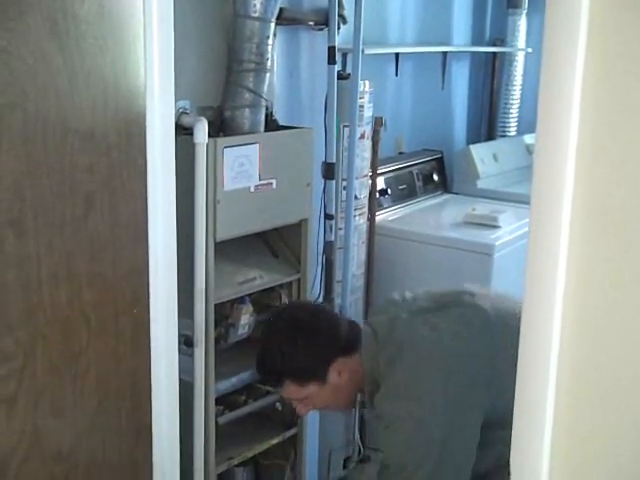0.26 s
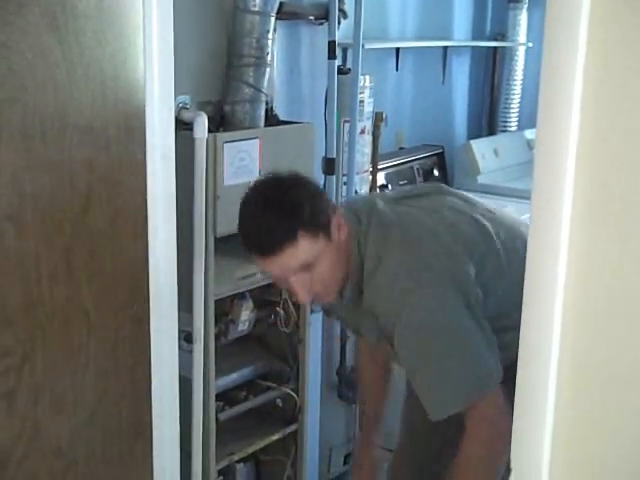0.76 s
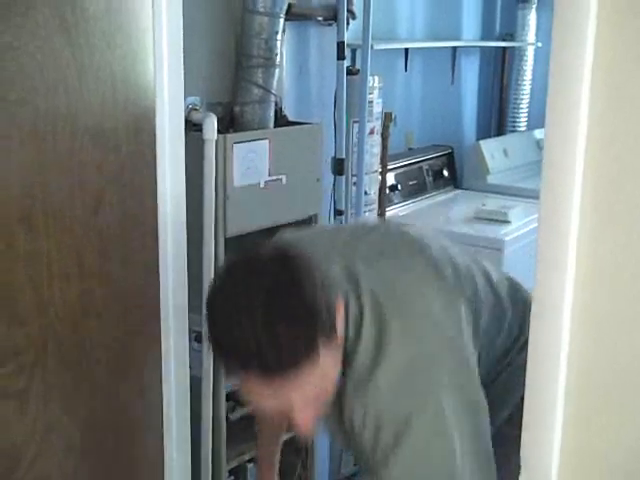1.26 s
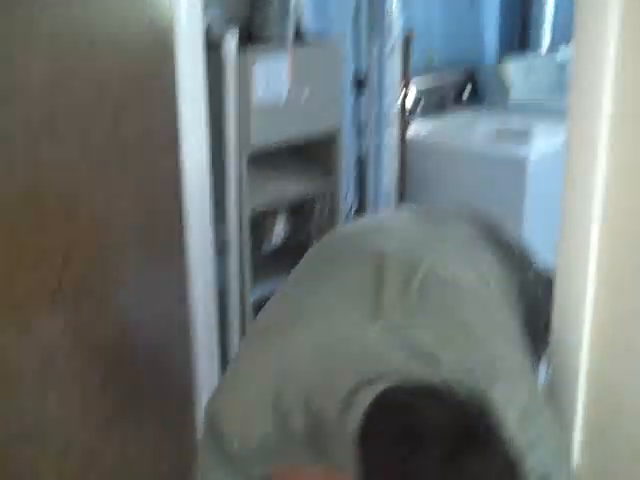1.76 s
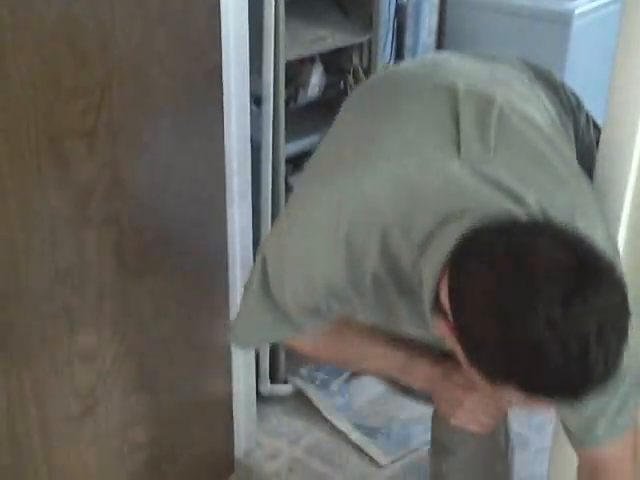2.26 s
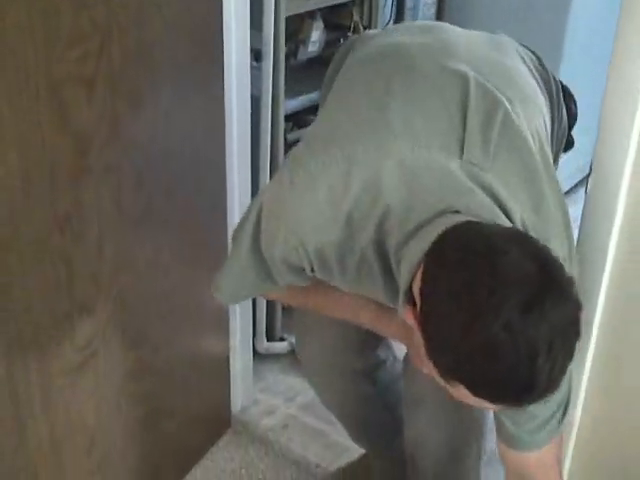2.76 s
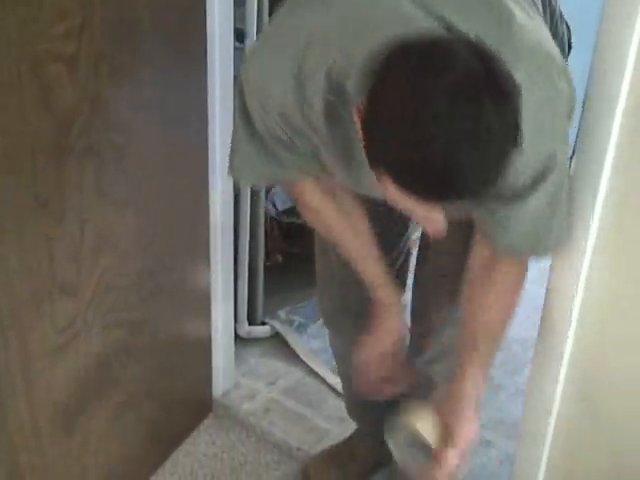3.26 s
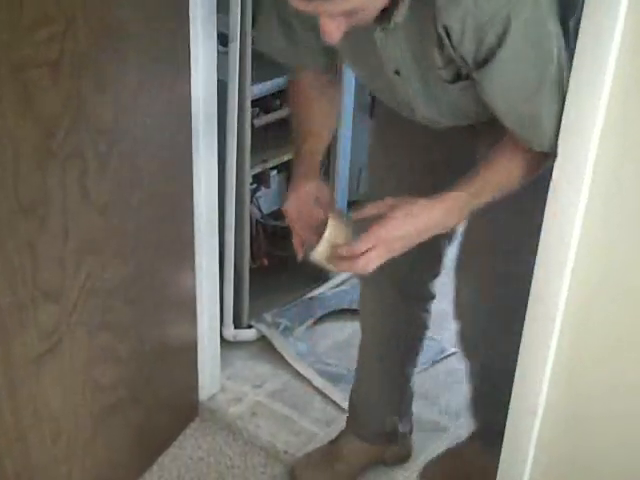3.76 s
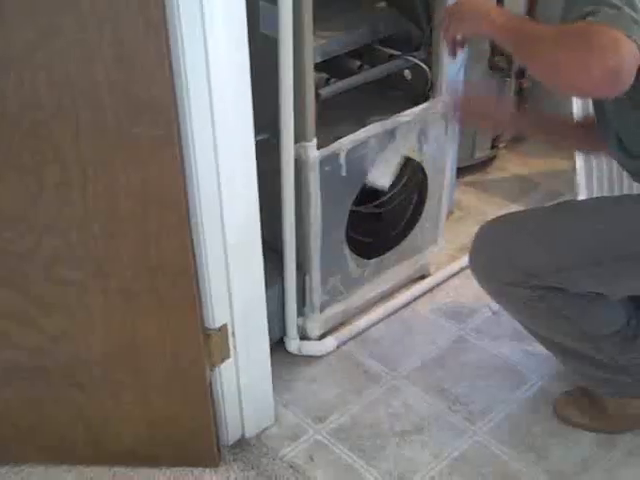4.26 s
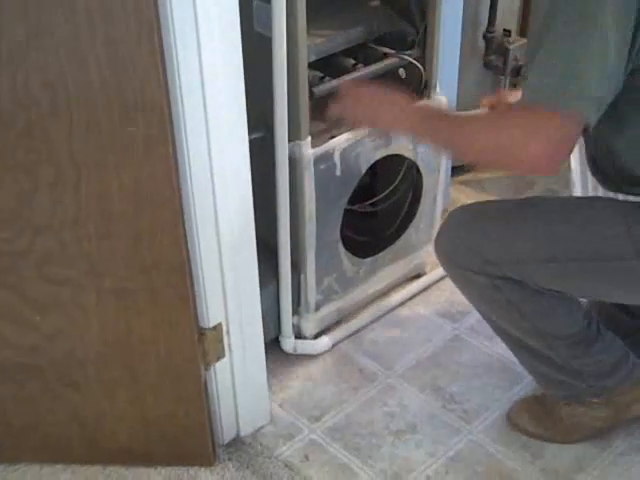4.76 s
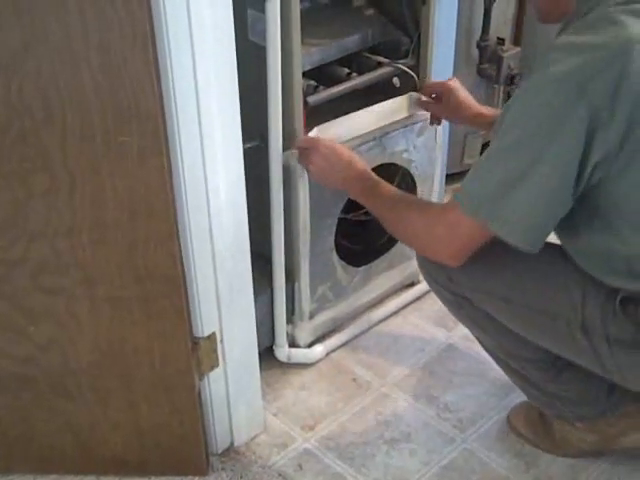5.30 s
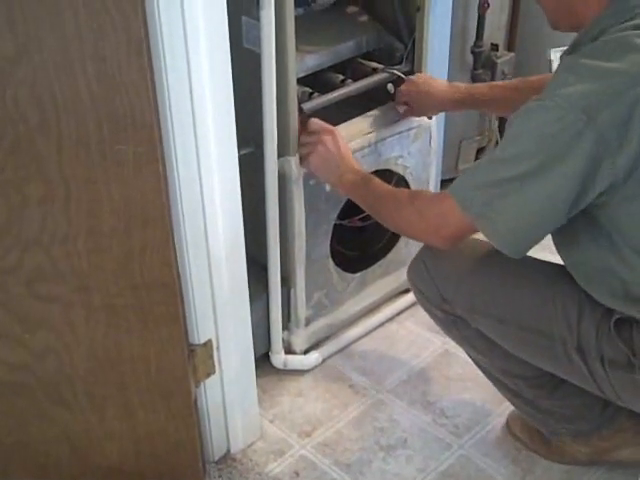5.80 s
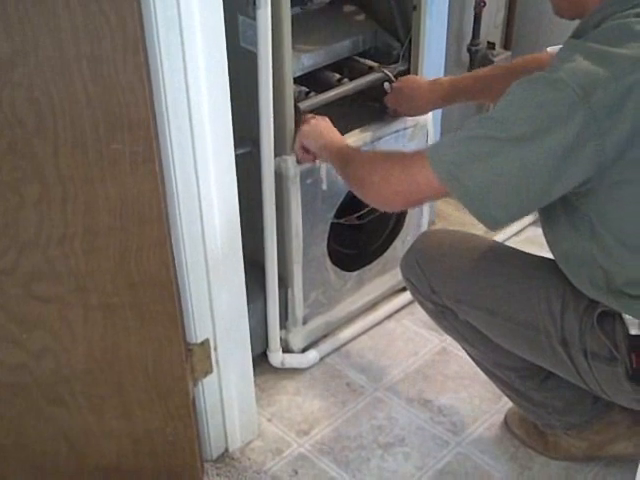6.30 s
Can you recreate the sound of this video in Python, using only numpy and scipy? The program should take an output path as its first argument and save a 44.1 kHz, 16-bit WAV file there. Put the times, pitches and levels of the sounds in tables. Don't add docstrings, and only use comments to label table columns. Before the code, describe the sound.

A small, hard, reverberant closet under steady recorder hiss. Light knocks on hollow sheet metal at 0 and 0.27 s, with faint rustle; at 0.7-0.78 s a loud clattering cluster of panel bangs, ringing briefly, then a smaller knock at 0.93. From 1.57 s plastic sheeting crumples in crackling bursts with sharp snaps and faint high metal tinks, peaking at 2.15-2.2 in a hard bump that overloads the microphone; the hiss dips with a low thump and steps back up from about 2.5 to 2.8. A metallic knock lands at 2.44. Softer crinkling swells near 3.0 and 3.2, with a dull knock at 3.9 and a snap at 4.24. Silence falls at 4.33-4.43, then hiss returns with a thump. A knock at 4.66, then a bright tape pull near 4.75, small peels and ticks at 4.9-5.5, snaps around 5.7-5.85, and strong crackling snaps from 6.06 to 6.4, fading.

```python
import sys
import numpy as np
from scipy import signal
from scipy.fft import rfft, irfft
from scipy.io import wavfile

SR = 44100
rng = np.random.default_rng(int(sys.argv[2]) if len(sys.argv) > 2 else 0)


def unload_audio(sound):
    columns = np.transpose(np.atleast_2d(sound))
    steps = np.round(np.clip(columns, -1, 1) * 32767)
    wavfile.write(sys.argv[1], SR, steps.astype(np.int16))


def boost_factor(decibels):
    exponent = np.asarray(decibels, float) / 20
    return 10 ** exponent


N = 288414
SILENCE_START_S, SILENCE_END_S = 4.327, 4.4256


def rms_one(x):
    return x / np.sqrt(np.mean(x ** 2) + 1e-20)


def at_hz(points, hz):
    points = np.array(points)
    return np.interp(np.log(hz), np.log(points[:, 0]), points[:, 1])


def coloured(x, spectrum):
    hz = np.fft.rfftfreq(N, 1 / SR) + 1
    return rms_one(irfft(rfft(x) * boost_factor(at_hz(spectrum, hz)), N))


def band_pass(x, low, high):
    return signal.sosfilt(signal.butter(2, [low, high], "band", fs=SR, output="sos"), x)


def high_pass(x, hz):
    return signal.sosfilt(signal.butter(2, hz, "high", fs=SR, output="sos"), x)


def drift(rate_hz):
    r = np.exp(-2 * np.pi * rate_hz / SR)
    wander = signal.lfilter([1], [1, -2 * r, r * r], rng.standard_normal(N + SR))
    return rms_one(wander[SR:])


def grains(per_s, spread_db):
    sizes = boost_factor(spread_db * np.minimum(rng.exponential(1, N), 5)) * rng.choice([-1, 1], N)
    return rms_one(sizes * (rng.random(N) < per_s / SR))


def film_bands(x):
    # f/Hz, level/dB per Hz
    film = [(71, -46), (120, -33), (221, -13.5), (416, -12), (691, -5.5), (1170, -4.5), (1590, 6.5),
            (1870, -7), (2870, 2), (12200, -9), (15600, -11)]
    anchors = np.log([700, 3000, 10000])
    edges = 130 * 2 ** np.arange(0, 7.1, .5)
    for k, (low, high) in enumerate(zip(edges, edges[1:])):
        hz = np.sqrt(low * high)
        band = band_pass(x[k % 2], low, high)
        near = [np.interp(np.log(hz), anchors, one) for one in np.eye(3)]
        anchor_db = sum(share * at_hz(film, np.exp(a)) for share, a in zip(near, anchors))
        yield band * boost_factor(at_hz(film, hz) - anchor_db) * (-1) ** k, near[0], near[2]


def thuds():
    # t/s, f/Hz, level/dB, t60/s
    hollows = [(.004, 685, -51.5, 0.077), (.022, 470, -54.5, 0.36), (.024, 790, -57, 0.12),
               (.28, 422, -61.5, 0.27), (.706, 330, -38.5, 0.056), (0.801, 152, -57, .5),
               (1.2, 600, -63.5, 0.79), (2.151, 1050, -41, .03), (2.44, 1550, -45.5, 0.69),
               (2.446, 4640, -44.5, 0.37), (.735, 2120, -36.5, 0.29), (2.801, 1310, -58, .5),
               (3.215, 272, -58, .1), (3.91, 255, -57.5, 0.19), (4.6, 486, -59, 0.13)]
    half_width = 0.17
    out, age = np.zeros(N), np.arange(SR // 2) / SR
    for s, hz, level_db, t60 in hollows:
        noise = rng.standard_normal(len(age))
        cluster = rms_one(band_pass(noise, hz * (1 - half_width), hz * (1 + half_width)))
        out[round(s * SR):][:len(age)] += boost_factor(level_db - 60 * age / t60) * cluster
    return out


def panel():
    # t/s, peak level/dB, centre f/Hz
    knocks = [(0.023, -46, 617), (0.045, -45, 453), (0.266, -39.5, 875), (.705, -21, 1470),
              (.728, -16, 1320), (.740, -19, 1920), (0.75, -19, 1190), (.761, -17.5, 1200),
              (0.773, -21.5, 1800), (.927, -30, 1840), (1.194, -43, 570), (2.421, -35.5, 1220),
              (2.436, -29, 1450), (2.452, -27.5, 1600), (3.214, -38, 920), (3.908, -31.5, 370.4),
              (4.24, -39, 570), (4.543, -45, 904), (4.662, -32, 1870)]
    # f/Hz, level/dB per Hz
    sheet_metal = [(88, -64), (150, -38.5), (397, -17), (428, -10.5), (524, -6), (630, -6.5), (885, -6.5),
                   (1020, -3), (1590, -4.5), (1720, -8.5), (1860, -7), (4270, -22.5), (6000, -34),
                   (7800, -59.5), (13200, -120)]
    shimmer = coloured(rng.standard_normal(N), sheet_metal)
    out, age = np.zeros(N), np.arange(SR // 4) / SR
    decay = boost_factor(-60 * age / 0.19) + 1.99 * boost_factor(-60 * age / 0.028)
    for s, peak_db, hz in knocks:
        i = round(s * SR)
        body = shimmer[i:i + len(age)] * decay
        spot = band_pass(body, hz / 1.51, hz * 1.48)
        out[i:i + len(age)] += boost_factor(peak_db - 21) * (0.8 * body + 0.84 * spot)
    return high_pass(out, 260)


def handling():
    # peak t/s, level/dB, rise/s and fall/s over 20 dB, brightness/dB
    sheet_moves = [(.17, -67.5, 0.89, 1, -9), (.70, -60, 0.33, .03, -2), (1.622, -49.5, 0.042, 0.23, 1.5),
                   (1.883, -54, 0.081, 0.48, 1.5), (2.075, -50.5, 0.033, 0.34, 5),
                   (2.143, -44.5, 0.14, 0.035, -3), (2.23, -56.5, 0.061, 0.057, 1),
                   (2.40, -59, 0.28, 0.14, -4), (.58, -64.5, .1, .3, -7), (2.671, -55, 0.12, 0.11, 2),
                   (2.791, -54.5, .1, 0.5, 0), (2.9, -60, 0.23, 0.18, 2), (3.12, -62, .2, .2, -0.5),
                   (1.79, -67, 0.15, .2, 1), (3.001, -46, 0.12, 0.14, 1), (3.205, -53, 0.22, 0.069, 5.5),
                   (3.335, -63.5, 0.092, 0.17, 1), (3.704, -62, .11, 0.23, -4.5),
                   (3.806, -71, 0.14, 0.066, 2), (4.096, -64.5, 0.2, 0.55, 0)]
    # peak t/s, level/dB, rise/s and fall/s over 20 dB, brightness/dB
    tape_moves = [(4.53, -88, 0.19, 0.092, -8), (4.757, -41, 0.14, 0.15, 5), (4.904, -54, 0.16, 0.071, 8),
                  (5.049, -64, 0.087, 0.056, 14), (5.198, -54.5, 0.07, 0.093, 8.5),
                  (5.724, -55.5, 0.083, 0.087, 2), (5.62, -66, 0.074, 0.084, 5), (5.8, -58, .06, .1, -2),
                  (5.9, -56.5, 0.27, 0.042, -3), (6.0, -64.5, .4, 0.24, -4),
                  (6.096, -43.5, 0.04, 0.14, -2.5), (6.226, -46.5, 0.065, 0.097, -13),
                  (6.338, -52, 0.034, 0.33, 1), (6.398, -54.5, 0.16, .14, -10.5),
                  (6.528, -63, 0.13, .2, -1)]
    # t/s, level/dB, fall/s, dull part/dB, bright part/dB
    shakes = [(0.029, -73.5, 0.1, 20, -11), (.27, -57, .2, -9, -6), (.707, -40.5, 0.18, 4.5, -16),
              (0.731, -38, 0.059, 1, -24), (.93, -62, .25, 7, -12), (1.19, -71.5, 1, 3.5, -4),
              (2.186, -35, 0.066, -17.5, -10), (2.436, -42.5, 0.21, -7.5, -14), (3.914, -63, 0.14, 6, -6),
              (4.244, -56.5, 1, -9.5, 3.2), (4.427, -58, 0.092, -13, -3), (4.59, -59.5, 0.16, -10, -13),
              (4.664, -49, 0.79, -14.5, -6.5), (5.495, -66.5, .9, -4, -1), (6.062, -56, 0.37, -17, -3)]
    # level/dB of the middle, dull and bright parts
    still = [-90, -86, -81.5]
    moves = []
    for rows, base_dull_db, base_bright_db in [(sheet_moves, -8.5, -1.8), (tape_moves, -12, -6.5)]:
        for s, db, rise, fall, tilt in rows:
            dull_db = base_dull_db - 0.78 * tilt
            moves.append((s, db, rise, fall, dull_db, base_bright_db + tilt))
    for s, db, fall, dull_db, bright_db in shakes:
        moves.append((s, db, 0.0033, fall, dull_db, bright_db))

    t = np.arange(0, N + 32, 32) / SR
    power = boost_factor(np.array(still)[:, None] + 0 * t) ** 2
    lingers = np.array([[1], [1.5], [0.75]])
    for s, db, rise, fall, dull_db, bright_db in moves:
        rising = (s - t) / max(rise, .002)
        falling = (t - s) / (max(fall, .01) * lingers)
        part_db = db + np.array([[0], [dull_db], [bright_db]])
        same_scene = (t < SILENCE_END_S) | (s > SILENCE_START_S)
        power = power + same_scene * boost_factor(part_db - 20 * np.maximum(rising, falling)) ** 2
    return [np.interp(np.arange(N) / SR, t, 10 * np.log10(p)) for p in power]


def crinkles(level_db):
    flips = grains(per_s=1200 * boost_factor(3.0 * drift(18)), spread_db=3.5)
    pitch_of_flip = rng.integers(0, 20, N)
    out = np.zeros(N)
    for k, hz in enumerate(np.geomspace(2100, 9000, 20)):
        r, w = boost_factor(-60 * hz / (14.0 * SR)), 2 * np.pi * hz / SR
        struck = flips * (pitch_of_flip == k) + 1e-18
        out += signal.lfilter([.5, 0, -.5], [1, -2 * r * np.cos(w), r * r], struck)
    return rms_one(out) * boost_factor(level_db - 5.5)


def rustle():
    level_db, dull_db, bright_db = handling()
    creases = grains(per_s=6000, spread_db=2.0)
    source = 0.65 * creases + 0.62 * rng.standard_normal((2, N))
    shared, patches = drift(36), [drift(21) for k in range(3)]
    out = crinkles(level_db)
    for k, (band, dull, bright) in enumerate(film_bands(source)):
        flicker_db = 1.66 * shared + 1.12 * patches[k % 3]
        middle = 1 - dull - bright
        worked_db = middle * (level_db + 5.0) + dull * (dull_db + 10.5) + bright * (bright_db + 1.5)
        out = out + band * boost_factor(flicker_db + worked_db)
    return out


def snaps():
    # t/s, peak level/dB, bright part/dB relative
    creases = [(.2668, -42.5, -20), (.4419, -49, -18), (.4943, -49, -12), (.7043, -19.5, -23.5),
               (.7312, -22, -27), (.9273, -37, -19), (1.5753, -41.5, -27), (1.6008, -36, -17),
               (1.6234, -29, -25), (1.646, -36, -2), (1.67, -37, -12), (1.689, -52, -2.5),
               (1.8677, -40, -8), (1.8806, -39, -13), (1.9495, -37.5, -8), (1.9749, -43, -8),
               (2.0303, -52.5, -2), (2.149, -30, -3), (2.1839, -23.5, -7), (2.205, -44, -12),
               (2.228, -35, -10.5), (2.3261, -42.5, -14), (2.4339, -20, -20), (2.4514, -27, -18),
               (2.7861, -52, -9), (3.2141, -38, -18), (3.9095, -50, -32), (4.2388, -31, -16)]
    # t/s, peak level/dB, bright part/dB relative
    peels = [(4.589, -42.5, -4), (4.608, -56, -15), (4.663, -27.5, -29), (4.748, -30.5, -13),
             (4.8828, -32.5, -2), (5.1457, -57, 6), (5.1776, -33.5, -4), (5.241, -51, -20),
             (5.4949, -41.5, -12), (5.6116, -49, -7), (5.689, -45, -13), (5.7069, -40, -9),
             (5.7344, -29.5, -13), (5.7853, -37.5, -15), (5.7997, -32.5, -16), (5.8501, -36, -9.5),
             (5.893, -45, -9), (6.0586, -30.5, -11.5), (6.068, -30.5, -13), (6.0906, -22, -20),
             (6.1054, -28, -12), (6.2128, -30, -8), (6.2302, -29.5, -8), (6.3315, -27.5, -7.5),
             (6.3829, -26.5, -5.5), (6.5206, -37.5, -4.5), (6.5375, -39, -2)]
    t60_s, snap_dull_db = 0.032, -13
    envelope, crack, dull_db, bright_db = np.zeros((4, N))
    for rows in [creases, peels]:
        for s, peak_db, high_db in rows:
            i = round(s * SR)
            age = np.arange(min(N - i, SR // 8)) / SR
            envelope[i:i + len(age)] += boost_factor(peak_db - 1.0 - 60 * age / t60_s)
            crack[i] = boost_factor(peak_db + 9)
            dull_db[i:], bright_db[i:] = snap_dull_db, high_db - 2.5
    crackle = .5 * grains(per_s=12000, spread_db=2.0) + 0.83 * rng.standard_normal(N)
    burst = crack + envelope * crackle
    return sum(band * boost_factor(dull * dull_db + bright * bright_db)
               for band, dull, bright in film_bands([burst, burst]))


def ticks():
    # t/s, peak level/dB
    glue = [(0.7372, -32), (0.76, -34), (2.148, -34), (2.3433, -42.5), (3.6027, -49), (3.649, -46),
            (3.688, -45), (3.7883, -48), (4.0766, -51), (4.2487, -49), (4.6284, -46), (5.0244, -47),
            (5.0485, -34.5), (5.3595, -46.5), (5.6725, -51), (5.6945, -43), (5.8955, -38), (6.2494, -46),
            (6.3494, -38)]
    starts = np.zeros(N)
    starts[[round(s * SR) for s, db in glue]] = boost_factor(np.array(glue)[:, 1] - 7.0)
    envelope = signal.lfilter([1], [1, -boost_factor(-60 / (0.028 * SR))], starts)
    return high_pass(envelope * rng.standard_normal(N), 5500)


def tinks():
    # t/s, f/Hz, peak level/dB, t60/s
    metal_parts = [(1.6, 6360, -47.5, 0.055), (1.6, 12200, -47.5, 0.1), (1.688, 14500, -53, .06),
                   (2.03, 6340, -43.5, 0.084), (2.03, 4350, -51, .06), (2.15, 14600, -36, .1),
                   (2.153, 10900, -60, .15), (2.153, 6100, -48, 0.088), (2.172, 14461, -44, .08),
                   (2.2, 14400, -52, .1), (2.305, 5600, -58, 0.18)]
    # t/s, f/Hz, peak level/dB, t60/s
    jolt = [
        (2.1503, 274, -24.5, 0.0077),
    ]
    out, age = np.zeros(N), np.arange(SR // 3) / SR
    for s, hz, peak_db, t60 in [*metal_parts, *jolt]:
        ring = boost_factor(peak_db - 60 * age / t60) * np.sin(2 * np.pi * hz * age)
        out[round(s * SR):][:len(age)] += ring
    return out * boost_factor(6.0 * drift(80))


def closet(x):
    # f/Hz, t60/s
    decay = [(150, 1), (600, 0.61), (2000, 0.44), (6000, 0.38), (15000, .2)]
    age, edges = np.arange(SR) / SR, 100 * 2 ** np.arange(0, 7.4, .5)
    tail = np.zeros(SR)
    for low, high in zip(edges, edges[1:]):
        band = band_pass(rng.standard_normal(SR), low, high)
        tail += band * boost_factor(-60 * age / at_hz(decay, low))
    tail = tail * (age > .003)
    return signal.fftconvolve(x, tail / np.sqrt(np.sum(tail ** 2)))[:N]


def scene():
    cracks, metal, rings = snaps() + ticks(), panel(), tinks()
    room = closet(boost_factor(-11.5) * cracks + boost_factor(-9.0) * metal + boost_factor(-26) * rings)
    return (rustle() + thuds() + cracks + metal + rings + room)[None]


def top_cut(x):
    return signal.sosfilt(signal.butter(12, 15730, fs=SR, output="sos"), x)


def record(dry):
    # f/Hz, level/dB per Hz
    hiss_colour = [(12, -34), (20, -7), (30, -5.5), (64, -12), (405, -16.5), (1070, -20), (2160, -23),
                   (4970, -26.5), (6390, -31), (13200, -31.5), (15600, -29)]
    drop_s, drop_db, climb_s, step_s = 2.151, -9.0, 2.529, .0342
    offset, coupling_s, rest = -.037, .108, -.0006
    t = np.arange(N) / SR
    climbed = np.clip(np.floor((t - climb_s) / step_s) + 1, 0, 8) / 8
    gain = np.where(t > drop_s, boost_factor(drop_db * (1 - climbed)), 1)
    hiss = boost_factor(-66.5) * coloured(rng.standard_normal(N), hiss_colour) * gain
    live = (t < SILENCE_START_S) | (t > SILENCE_END_S)
    jumps = np.diff(gain, prepend=1) + (np.diff(live * 1., prepend=1) > 0)
    thump = signal.lfilter([offset / 8], [1, -7 / 8], jumps)
    thump = signal.lfilter([1], [1, -np.exp(-1 / (coupling_s * SR))], thump)
    fading = hiss * ~live * boost_factor(-11 - 70 * np.abs(t - SILENCE_START_S)) * (t < 4.385)
    treble_limit = signal.cheby2(10, 50, 16080, fs=SR, output="sos")
    taped = signal.sosfilt(treble_limit, (dry + hiss + thump + rest) * live + fading)
    return top_cut(taped)


dry = scene()
out = record(dry)
unload_audio(out)
```